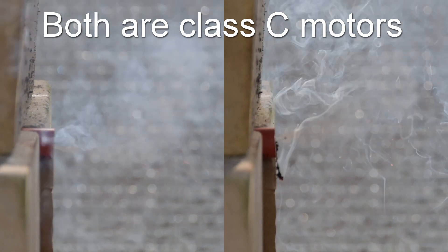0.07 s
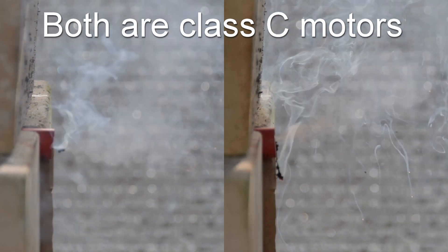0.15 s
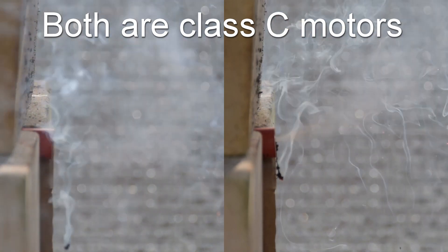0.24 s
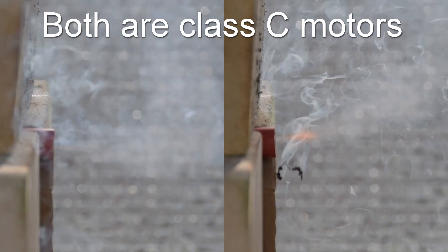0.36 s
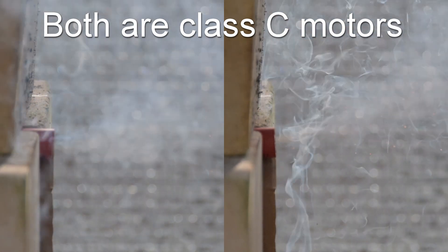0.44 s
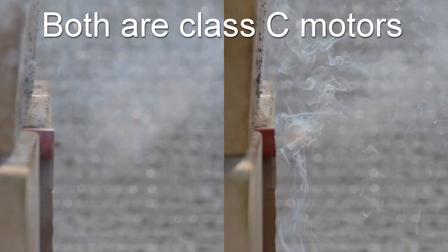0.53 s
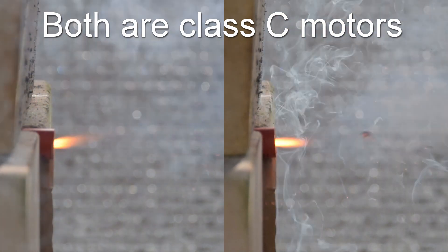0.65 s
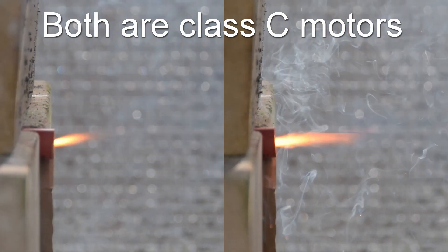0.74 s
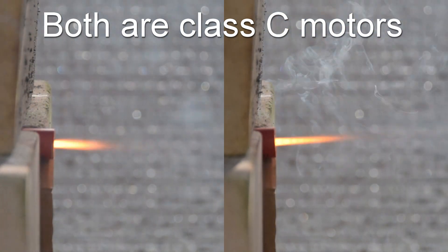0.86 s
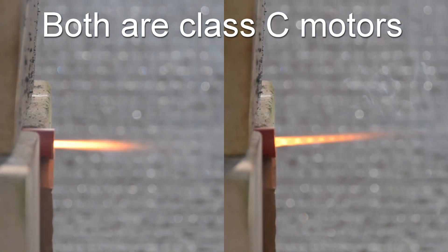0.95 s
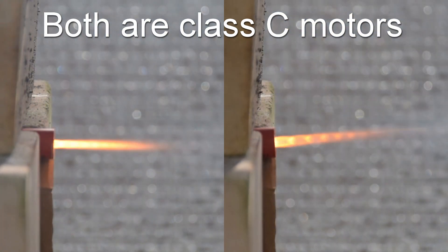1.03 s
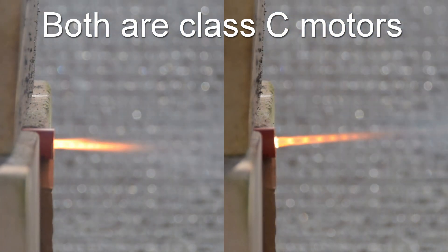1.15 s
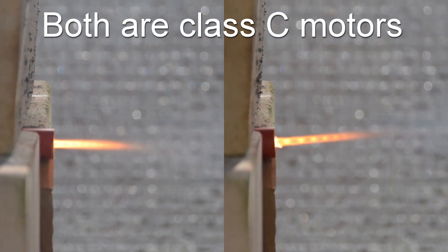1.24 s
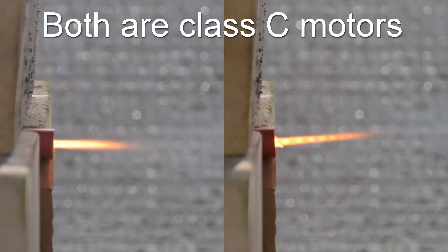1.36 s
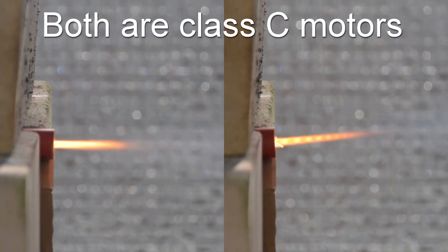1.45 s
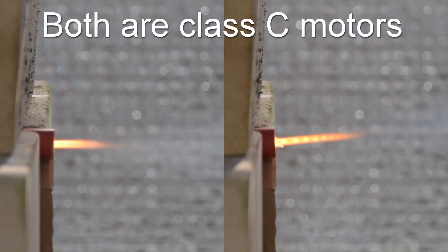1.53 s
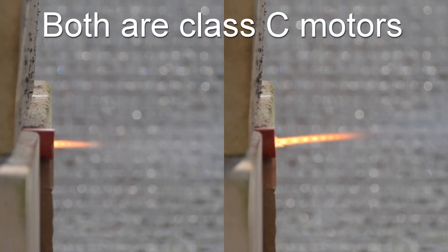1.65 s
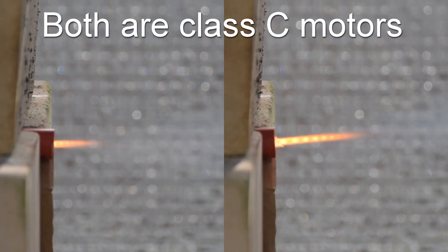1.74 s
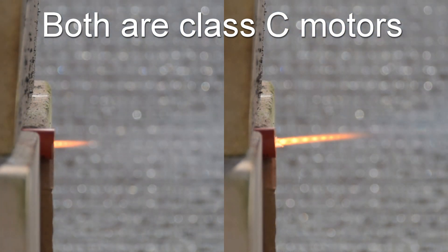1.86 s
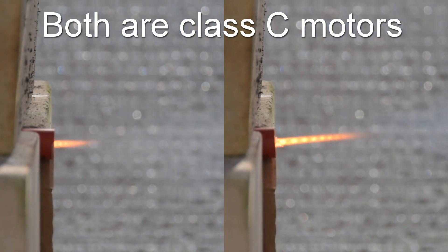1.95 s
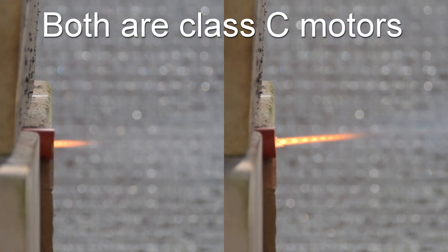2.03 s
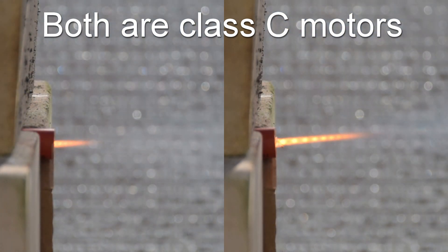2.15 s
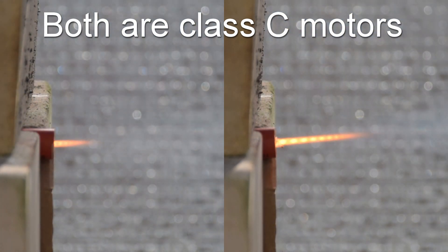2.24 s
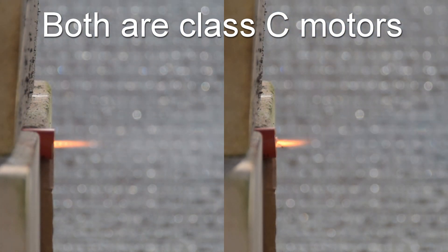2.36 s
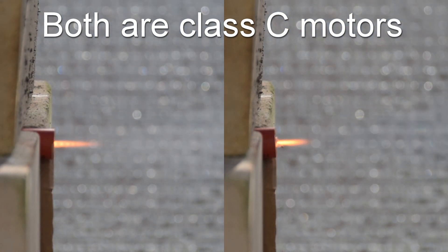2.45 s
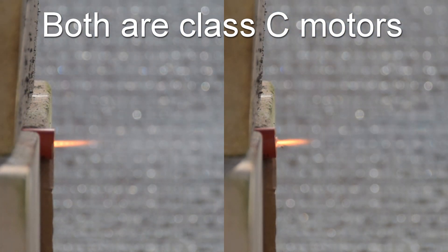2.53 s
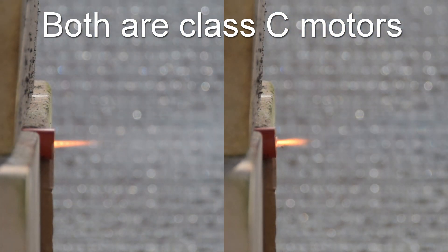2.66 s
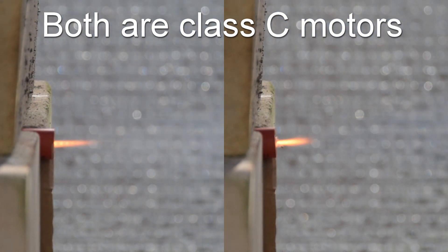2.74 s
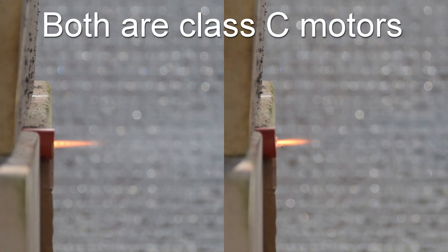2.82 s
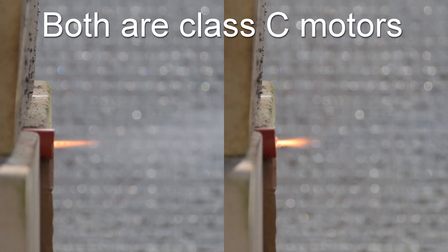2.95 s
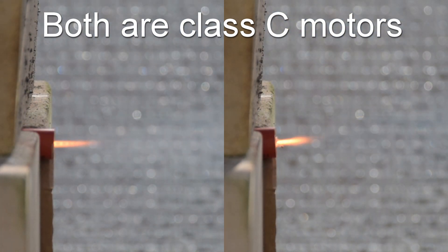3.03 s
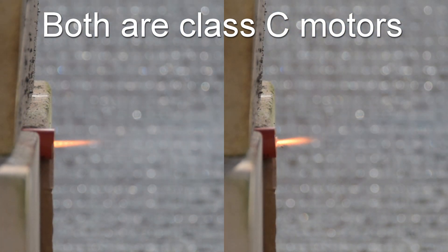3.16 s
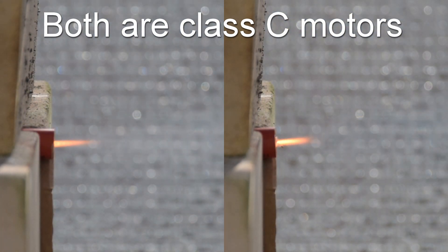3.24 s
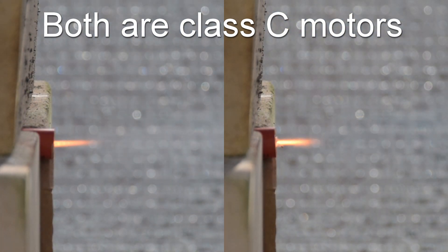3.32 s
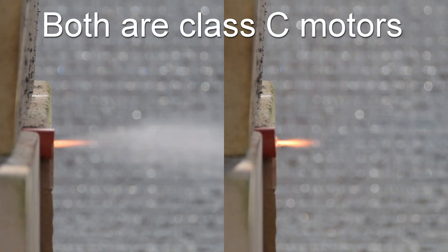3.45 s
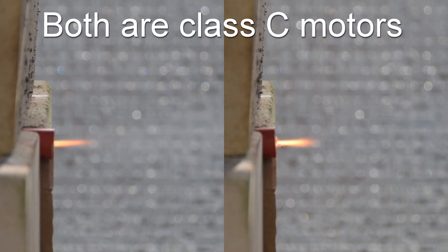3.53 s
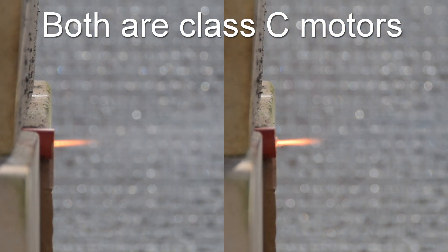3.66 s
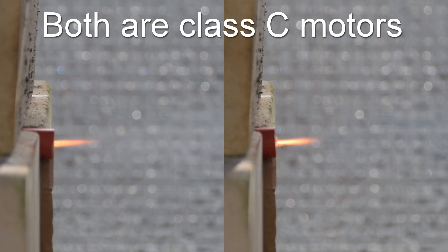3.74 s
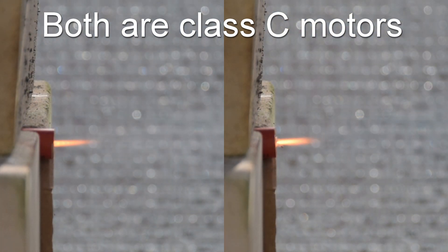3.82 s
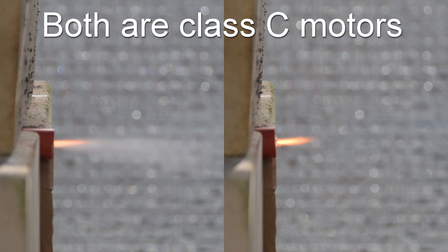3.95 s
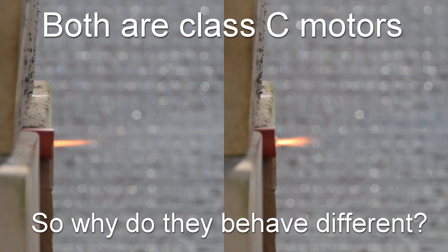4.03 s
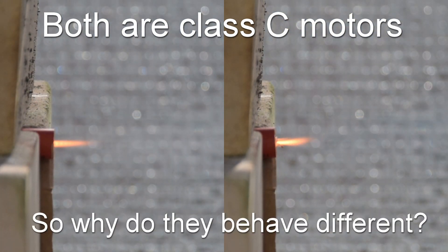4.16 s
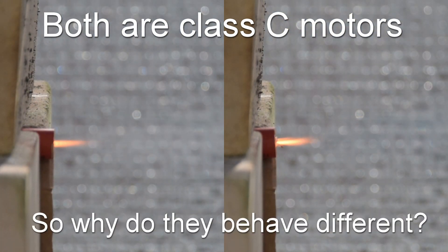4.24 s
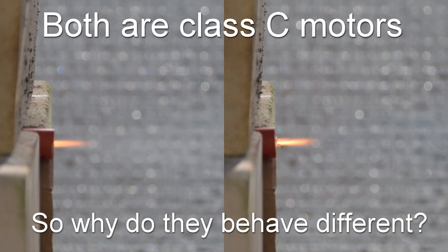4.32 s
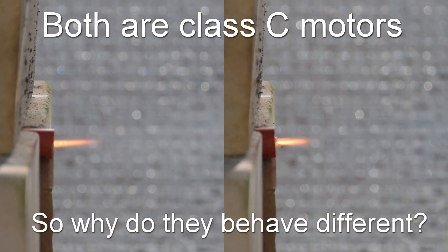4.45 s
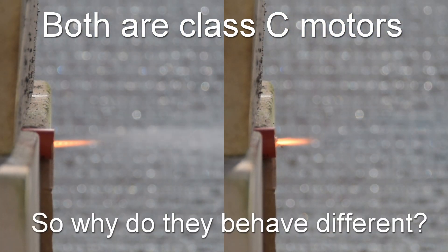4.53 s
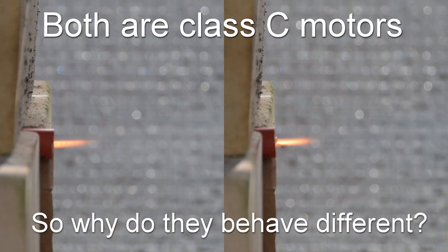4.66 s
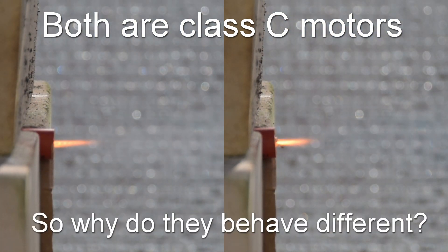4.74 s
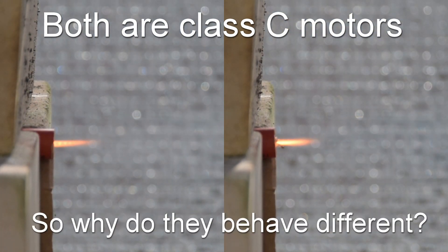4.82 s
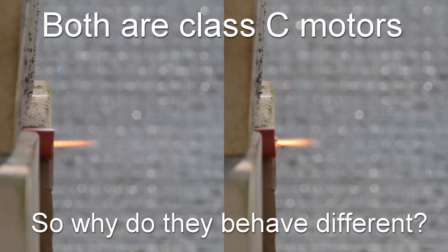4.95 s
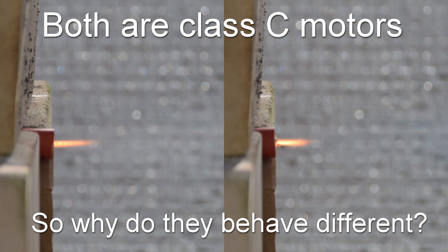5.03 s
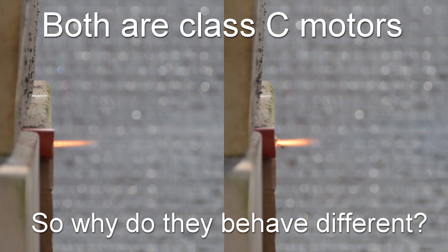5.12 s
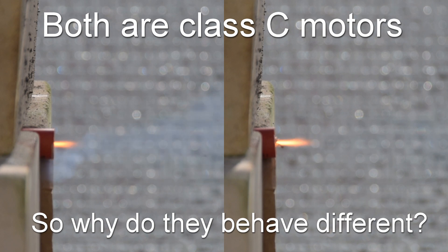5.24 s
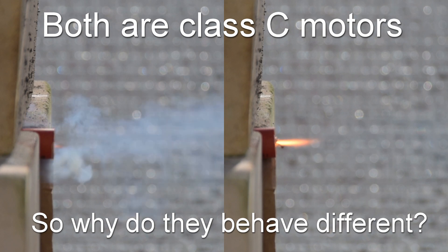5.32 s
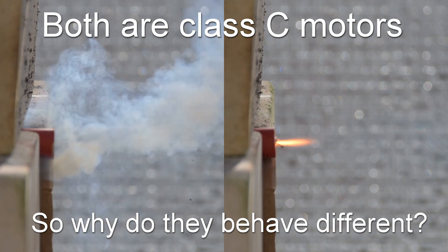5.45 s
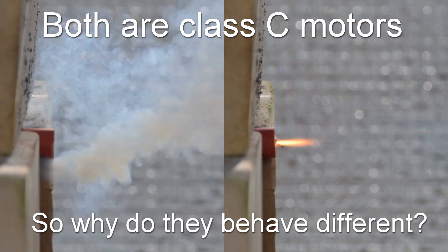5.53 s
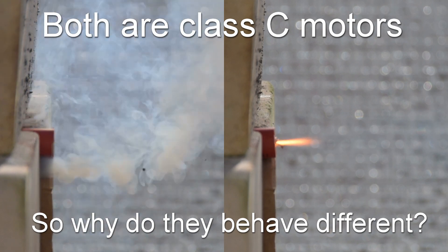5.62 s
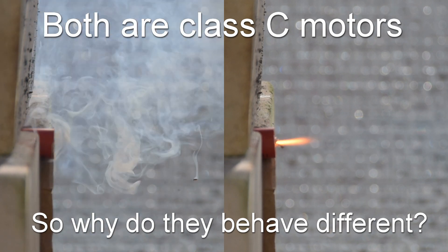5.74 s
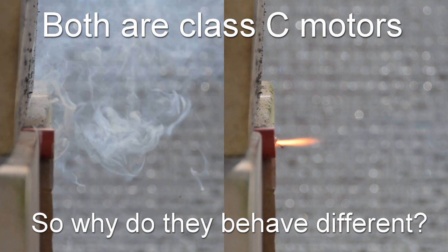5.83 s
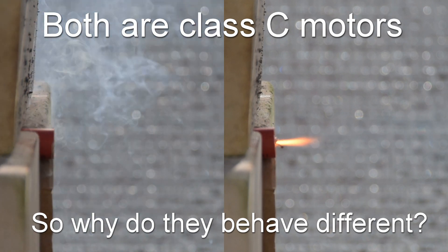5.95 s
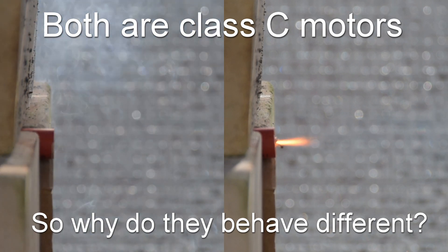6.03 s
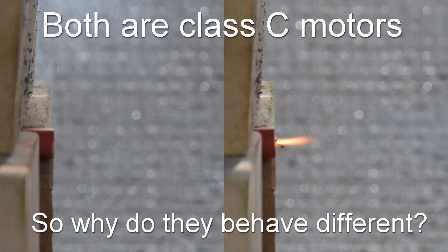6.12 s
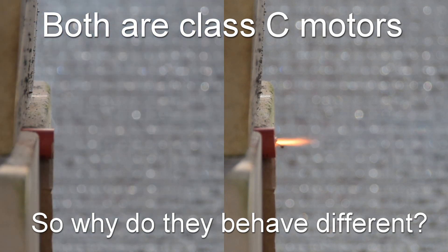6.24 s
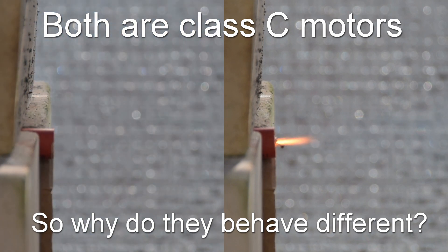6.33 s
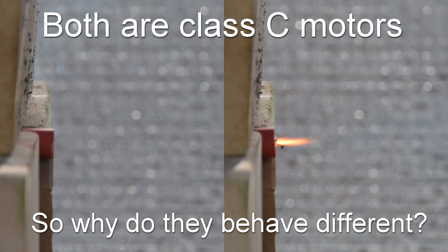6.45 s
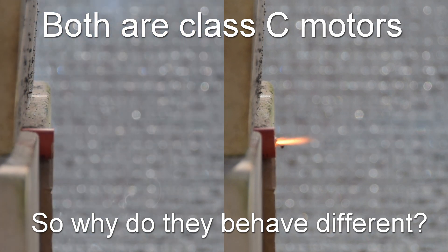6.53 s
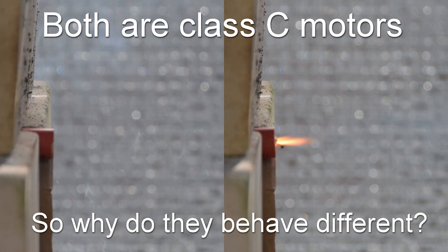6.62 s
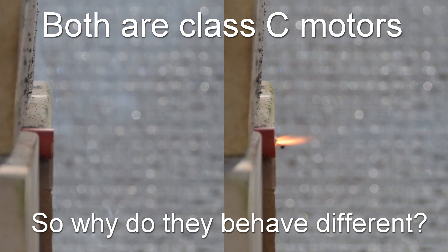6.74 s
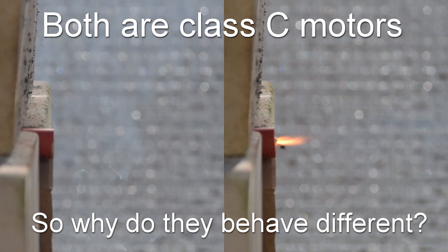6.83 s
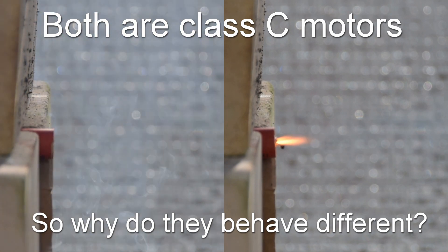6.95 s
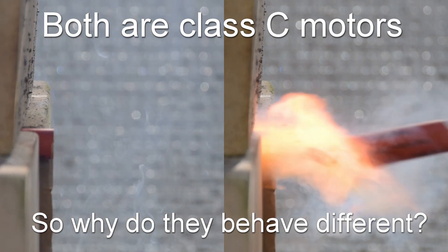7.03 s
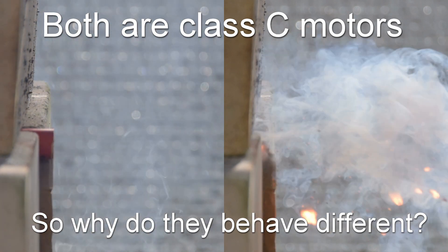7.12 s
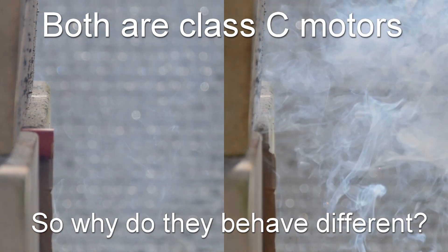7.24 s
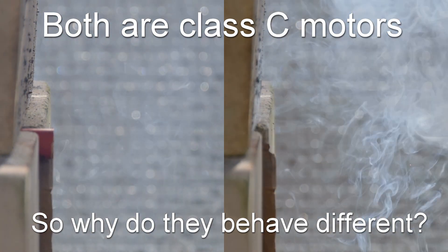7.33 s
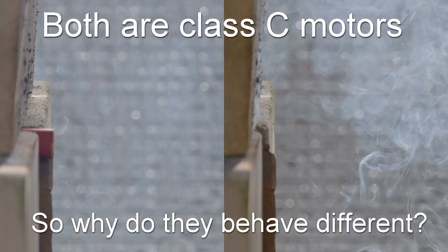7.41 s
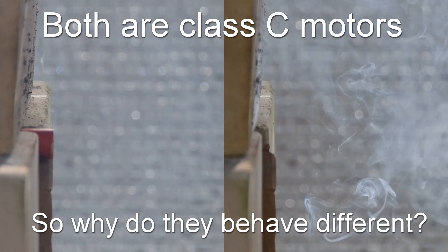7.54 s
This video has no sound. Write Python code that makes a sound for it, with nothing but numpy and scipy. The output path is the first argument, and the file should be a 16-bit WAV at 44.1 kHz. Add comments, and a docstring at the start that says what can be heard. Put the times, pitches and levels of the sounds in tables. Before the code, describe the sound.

Two small solid-fuel rocket motors light on a test stand in a walled yard. A brief fizz leaps into a roar, with gusts buffeting the single close microphone. The burn settles into a loud, steady hiss for a few seconds, then falls away to a faint fizz. A sharp, hollow bang echoes briefly between the walls, and two small pops follow over a quiet outdoor background.

```python
"""A faint fizz comes first, as two small solid-fuel rocket motors light on a test stand in a walled yard.
At peak thrust the turbulent plume roars and its eddies buffet the one close microphone; the burn then
settles to a steady nozzle hiss that dies away. A delay charge hisses on faintly until the ejection
charge bangs, ringing the casing and echoing between the walls. Two small pops follow."""
import sys
import numpy as np
from scipy import signal
from scipy.fft import rfft, irfft
from scipy.io import wavfile
from scipy.ndimage import uniform_filter1d

SR = 44100
rng = np.random.default_rng(int(sys.argv[2]) if len(sys.argv) > 2 else 0)


def dump_mix(stems):
    """Bounce the given channels to the path in sys.argv[1] as a 16-bit WAV at rate SR."""
    frames = np.atleast_2d(stems).T  # one column per channel
    limited = np.clip(frames, -1, 1)  # hard clip at full scale
    pcm = np.round(limited * 32767).astype(np.int16)
    wavfile.write(sys.argv[1], SR, pcm)


N = 334278
T = np.arange(N) / SR

# Thrust: a peak, a long even burn, burn-out. Each row: time in seconds, relative hiss level in dB.
THRUST = [(0.7, -36), (0.73, -33), (0.77, -20), (0.9, -18.5), (0.92, -16), (1.08, -13.5), (1.19, -16),
          (1.92, -19), (2.27, -19), (2.42, -22.5), (3.74, -23), (5.18, -23), (5.21, -24.5), (5.32, -41.5),
          (5.45, -47)]
# The ejection charge: time in seconds, level of the gas rush in dB, level of the blast in dB.
EJECTION = (7.081, -16, -11.5)
# Spectra of low-pressure gas and of a blast. Each row: frequency in Hz, relative level in dB.
FIZZ_SPECTRUM = [(35, -51), (60, -19.5), (322, -12.5), (425, -12), (513, -6), (663, -9), (1190, -4),
                 (2330, -6), (3160, -5.5), (3900, -7.5), (7850, -3.5), (12200, -7), (15800, -16)]
BLAST_SPECTRUM = [(30, -9), (90, 0.5), (250, -1), (500, 5.5), (800, -2.5), (1200, 0.5), (2200, -5.5),
                  (5000, -10), (9000, -27), (15000, -65)]


def undb(db):
    """Amplitude ratio of a level in decibels."""
    return 10 ** (np.asarray(db) / 20)


def unit(x):
    """Normalisation to rms 1."""
    return x / np.sqrt(np.mean(x ** 2))


def curve(rows):
    """Linear interpolation of (time, value) rows."""
    times, values = np.transpose(rows)
    return np.interp(T, times, values)


def convolve(x, response):
    """Convolution with an impulse response."""
    return signal.fftconvolve(x, response)[:N]


def colour(x, spectrum, size=4096):
    """Minimum-phase filtering, at unit energy, to a (Hz, dB) outline."""
    hz, db = np.transpose(spectrum)
    log_hz = np.log(np.fft.rfftfreq(size, 1 / SR) + 1)
    cepstrum = irfft(np.log(undb(np.interp(log_hz, np.log(hz), db))))
    cepstrum[1:size // 2] *= 2  # folding the cepstrum makes the filter causal
    cepstrum[size // 2 + 1:] = 0
    response = irfft(np.exp(rfft(cepstrum)))
    return convolve(x, response / np.linalg.norm(response))


def resonance(x, hz, width_hz):
    """Second-order resonator with gain 1 at the centre."""
    return signal.lfilter(*signal.iirpeak(hz, hz / width_hz, SR), x)


def noise():
    """White noise of rms 1."""
    return rng.standard_normal(N)


def band_noise(hz, width_hz):
    """Noise of rms 1, narrowed by two resonators in series."""
    return unit(resonance(resonance(noise(), hz, width_hz), hz, 2 * width_hz))


def wander(rate_hz):
    """Smooth random modulation of rms 1, mostly slower than rate_hz."""
    span = max(int(SR / rate_hz), 1)
    return unit(uniform_filter1d(uniform_filter1d(noise(), span), span))


def burst(peak_s, rise_s, t60):
    """Exponential growth and decay: 60 dB up in rise_s, 60 dB down in t60."""
    return undb(-60 * np.maximum((peak_s - T) / rise_s, (T - peak_s) / t60))


def burning(lit_s, out_s, fade_s):
    """Linear gate that opens on lighting and closes at burn-out."""
    return np.clip((T - lit_s) / 0.0023, 0, 1) * np.clip(1 - (T - out_s) / fade_s, 0, 1)


def ambience(level_db=-64.5, swell_db=1):
    """Outdoor noise floor, slowly modulated in level."""
    # Each row: frequency in Hz, relative level in dB.
    spectrum = [(25, -14), (55, -6), (150, -8.5), (300, -3.5), (400, -14.5), (500, -1.5), (640, -13.5),
                (1000, -4.5), (1450, -6.5), (2200, -16), (3000, -14.5), (5000, -26), (15000, -45)]
    return colour(noise(), spectrum) * undb(level_db + swell_db * wander(5))


def yard(x, build_s=0.018):
    """Reverberation: direct sound, near-wall echoes that thicken, and a faint long tail."""
    # Each row: band in Hz, near-wall T60 in seconds and level in dB, tail T60 in seconds and level in dB.
    bands = np.array([(100, 0.21, -5, 1, -8), (700, 0.28, -7.5, 1, -19), (2000, 0.23, -3.5, 0.97, -13.5),
                      (5000, 0.24, -8.5, .6, -18.5), (12000, 0.16, -8, .35, -26.5)])
    edges_hz = np.sqrt(bands[1:, 0] * bands[:-1, 0])
    t = T[:SR]
    build_up = 1 - np.exp(-t / build_s)
    rest, response = rng.standard_normal(SR), np.zeros(SR)
    for k, (_, near_t60, near_db, far_t60, far_db) in enumerate(bands):
        band = rest
        if k < len(edges_hz):
            band = signal.sosfiltfilt(signal.butter(2, edges_hz[k], fs=SR, output="sos"), rest)
        rest = rest - band
        near, far = (undb(-60 * t / t60) * build_up for t60 in (near_t60, far_t60))
        near *= undb(near_db) / np.linalg.norm(near)
        far *= undb(far_db) / np.linalg.norm(far)
        response += band * np.hypot(near, far)
    response[0] = 1  # direct sound
    return convolve(x, response / np.linalg.norm(response))


def wall_slap(x, delay_s=0.032, slap_db=-14):
    """Single delayed reflection from the nearest wall."""
    return x + undb(slap_db) * np.interp(T - delay_s, T, x, left=0)


def stand(x, source):
    """Comb filtering: short reflections off the stand interfere with the direct sound."""
    # Each row: delay in milliseconds, relative amplitude for the jet, the same for the fizz.
    reflections = [(0.657, 0.17, 0.22), (0.791, -0.029, -0.054), (3.43, 0.019, 0.091), (4.085, 0.069, .16),
                   (6.5, 0.049, 0.18)]
    column = {"jet": 1, "fizz": 2}[source]
    hz = np.fft.rfftfreq(N, 1 / SR)
    comb = 1 + sum(row[column] * np.exp(-2j * np.pi * hz * row[0] / 1000) for row in reflections)
    return irfft(rfft(x) * unit(np.abs(comb)) * np.exp(1j * np.angle(comb)), N)


def lingering_boom():
    """Repeated reflection between distant walls prolongs the bang's hollow note."""
    # The note: centre in Hz, bandwidth in Hz, level in dB, T60 in seconds.
    after_ring = (718, 261, -36, 0.8)
    hz, width_hz, db, t60 = after_ring
    return undb(db) * band_noise(hz, width_hz) * burst(EJECTION[0] + 0.031, 0.05, t60)


def smoke_puffs():
    """Flow-excited resonance: slow gas blows a hollow note across the nozzle mouth."""
    # Each row: peak time in seconds, level in dB, centre and width in Hz, swell and T60 in seconds.
    puffs = [(0.742, -25, 2250, 1700, 0.18, 0.068), (0.85, -24.5, 850, 199, 0.2, 0.22),
             (5.35, -43.5, 860, 500, 0.99, 0.7), (5.61, -51.5, 890, 350, 0.81, 0.33)]
    return sum(undb(db) * band_noise(hz, width_hz) * burst(peak_s, swell_s, t60)
               for peak_s, db, hz, width_hz, swell_s, t60 in puffs)


def powder_fizz(flutter_db=0.3, ramp_s=0.023):
    """Flow noise of gas leaving the nozzle at low pressure, steady while each charge burns."""
    # Fuse, igniter and delay charge. Each row: start and end in seconds, level in dB.
    charges = [(0, 0.83, -72.5), (.6, 0.87, -39), (.8, 7.075, -43.5)]
    flow = sum(undb(db) * np.clip(0.5 + np.minimum(T - start, end - T) / ramp_s, 0, 1)
               for start, end, db in charges)
    return stand(colour(noise() * flow * undb(flutter_db * wander(18)), FIZZ_SPECTRUM), "fizz")


def late_pops(attack_s=0.0065):
    """Soft, hollow noise transients: each opens quickly, holds and decays exponentially."""
    # Each row: start in seconds, level in dB, hold and T60 in seconds.
    pops = [(7.336, -34, 0.022, 0.1), (7.56, -50.5, .022, .13)]
    # Each row: frequency in Hz, relative level in dB.
    spectrum = [(100, -23), (500, -11), (850, -1), (1150, -14.5), (1450, -6), (2300, -10.5), (5000, -19.5),
                (9000, -25.5), (15000, -42)]
    envelope = np.zeros(N)
    for start, db, hold_s, t60 in pops:
        age = T - start
        envelope += np.clip(age / attack_s, 0, 1) * undb(db - 60 * np.maximum(age - hold_s, 0) / t60)
    return colour(noise() * envelope, spectrum)


def ejection(rush_rise_s=0.043, rush_t60=0.038, blast_t60=0.11, ring_db=1, thump_db=-15, thump_s=0.0031):
    """Gas rushes out, then the cap blows: a blast wave that excites the empty casing's resonances."""
    # Each row: frequency in Hz, bandwidth in Hz, relative gain in dB.
    casing_modes = [(490, 130, 1), (730, 78, 9)]
    start, rush_db, blast_db = EJECTION
    rush = colour(noise() * burst(start, rush_rise_s, rush_t60), FIZZ_SPECTRUM)
    blast = colour(noise() * burst(start, 0.0028, blast_t60), BLAST_SPECTRUM)
    ring = sum(undb(db + ring_db) * resonance(blast, hz, width) for hz, width, db in casing_modes)
    age = np.maximum(T - start, 0) / thump_s
    thump = (T > start) * (1 - age) * np.exp(-age)  # overpressure, then a longer suction
    return undb(rush_db) * rush + undb(blast_db) * (blast + ring) + undb(thump_db) * thump


def ignition_flare(level_db=-17):
    """Combustion noise: the first flame leaves the nozzle as one short, dense roar."""
    flame = noise() * undb(level_db) * burning(lit_s=0.746, out_s=0.829, fade_s=0.012)
    return colour(flame, BLAST_SPECTRUM)


def flame_level(peak_s=0.757, peak_db=-13.5, sag_s=0.073):
    """Onset transient of the roar in dB: it leaps as the flame catches, sags, then collapses."""
    rise_db_per_s, sag_db_per_s, collapse_db_per_s = 501, 94, 999.5
    age = T - peak_s
    flame_db = peak_db + np.minimum(rise_db_per_s * age, -sag_db_per_s * age)
    return flame_db - collapse_db_per_s * np.maximum(age - sag_s, 0)


def roar_level(lag_s=0.034, knee_hiss_db=-21.5, knee_roar_db=-42, strong_slope=2.5, weak_slope=0.5):
    """Plume level in dB: a power law of the lagged thrust, steep above a knee, with swells and flame."""
    # Brief, irregular swells of the low roar. Each row: centre and length in seconds, lift in dB.
    swells = [(1.007, .06, 3), (1.12, 0.089, 9), (1.205, 0.065, 9.5), (1.28, 0.06, 5), (1.407, 0.085, 8),
              (1.594, 0.091, 2.5), (1.766, 0.025, 7), (2.207, 0.034, 5), (2.379, 0.034, 12),
              (3.04, 0.11, 8), (3.517, .1, 7.5), (4.014, .08, 5.5), (4.48, 0.076, 6), (4.613, 0.063, 7.5)]
    over_db = np.interp(T - lag_s, T, curve(THRUST)) - knee_hiss_db
    steady_db = knee_roar_db + over_db * np.where(over_db > 0, strong_slope, weak_slope)
    swell_db = sum(db * np.exp(-(2 * (T - at) / length_s) ** 2) for at, length_s, db in swells)
    return np.maximum(steady_db + swell_db, flame_level())


def gusts(gain_db=-5, full_db=-19, growth=2.3):
    """Wind noise: a strong plume stirs air at the microphone, growing faster than the roar up to a cap."""
    # Each row: frequency in Hz, relative level in dB.
    spectrum = [(20, -14.5), (50, -11), (90, -0.5), (200, -8.5), (400, -16), (1000, -20), (5000, -61.5)]
    level_db = full_db + gain_db + growth * np.minimum(roar_level() - full_db, 0)
    return colour(noise(), spectrum) * undb(level_db) * burning(lit_s=0.8, out_s=1.4, fade_s=0.3)


def buffets(gain_db=-3, width_s=0.00055, lag_s=0.001, rebound=0.53):
    """Near-field pressure of large eddies at the microphone: a brief suction, then a broader push."""
    # Each row: time in seconds, relative level in dB.
    eddies = [(0.746, -3), (0.759, -1), (0.764, -0.5), (0.801, -2), (1.052, -7), (1.089, -4.5),
              (1.129, -1.5), (1.198, -2), (1.259, -8), (1.275, -3.5), (1.296, -8), (1.309, -10), (1.4, -8),
              (1.438, -4), (1.479, -6.5)]
    pressure = np.zeros(N)
    for start, db in eddies:
        age = (T - start - lag_s) / width_s
        suction = np.exp(-age ** 2)
        push = rebound * np.exp(-((age - 2.6) / 2.9) ** 2)
        pressure += undb(db + gain_db) * (push - suction)
    return pressure


def plume_roar(gain_db=-1, eddies_per_s=3000, scatter_db=3, billow_db=1.2):
    """Turbulent mixing: eddies of unequal size break up at random, each a soft pressure pulse."""
    # Each row: frequency in Hz, relative level in dB.
    spectrum = [(20, -25.5), (45, -15), (80, -9.5), (180, -0.5), (400, 1.5), (750, -1), (1500, -2.5),
                (3000, -10.5), (8000, -42), (15000, -51)]
    sizes = undb(scatter_db * np.minimum(rng.exponential(size=N), 4)) * np.sign(noise())
    eddies = unit(sizes * (rng.random(N) < eddies_per_s / SR))
    drive = undb(roar_level() + gain_db + billow_db * wander(35))
    return colour(eddies * drive * burning(lit_s=0.741, out_s=5.5, fade_s=0.26), spectrum)


def nozzle_hiss(gain_db=1.35, flutter_db=0.34, sputter_db=0.5):
    """Jet noise from fine turbulence at the nozzle: it follows the thrust and flutters slightly."""
    # Each row: frequency in Hz, relative level in dB.
    spectrum = [(180, -41), (300, -9), (385, -23), (469, -11), (812, -7), (1380, -3), (2510, -2.5),
                (2960, -1), (3920, -1), (4550, -1.5), (6780, -1.5), (8000, 0), (12100, -3.5), (15000, -9),
                (15800, -17)]
    flow = noise() * undb(curve(THRUST) + gain_db + flutter_db * wander(22) + sputter_db * wander(250))
    return stand(colour(flow * burning(lit_s=0.68, out_s=5.36, fade_s=0.11), spectrum), "jet")


def scene():
    """Superposition, alike in both channels: the motors, bang and pops reverberate in the yard;
    boom, flare, gusts, buffets and background add directly."""
    motors = nozzle_hiss() + plume_roar() + powder_fizz() + smoke_puffs()
    bangs = wall_slap(ejection()) + late_pops()
    sound = yard(motors + bangs) + lingering_boom() + ignition_flare() + gusts() + buffets() + ambience()
    return np.array([sound, sound])


def record(dry, low_cut_hz=45, ceiling=0.9, top_hz=15750):
    """Band limiting and soft saturation: the microphone sheds deep bass, rounds peaks, cuts the top."""
    thin = signal.sosfilt(signal.butter(3, low_cut_hz, "high", fs=SR, output="sos"), dry)
    rounded = thin / (1 + (thin / ceiling) ** 4) ** 0.25
    return signal.sosfilt(signal.ellip(12, 0.1, 90, top_hz, fs=SR, output="sos"), rounded)


dry = scene()
out = record(dry)
dump_mix(out)
```